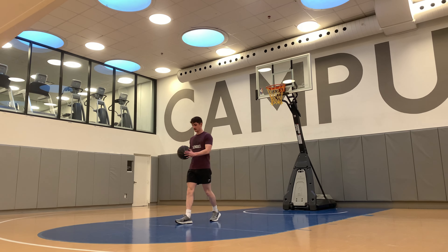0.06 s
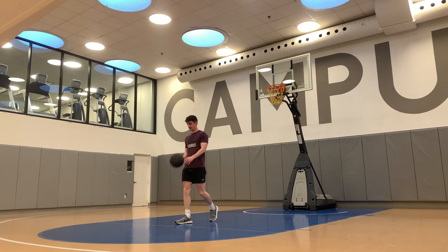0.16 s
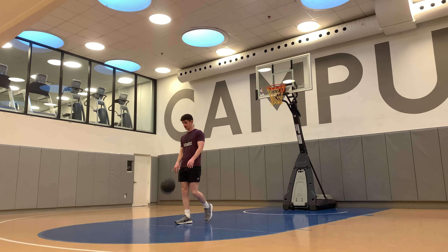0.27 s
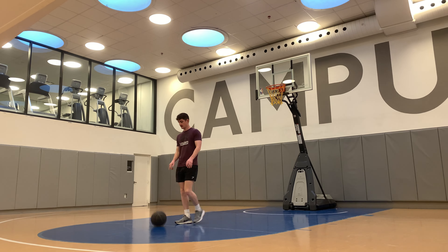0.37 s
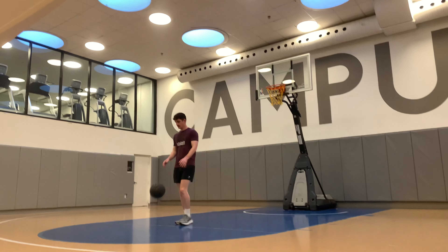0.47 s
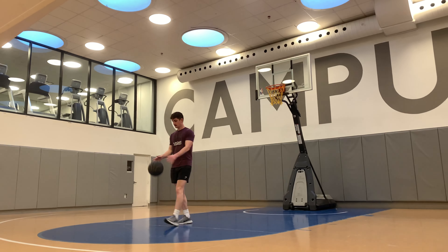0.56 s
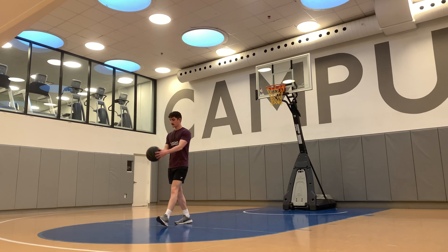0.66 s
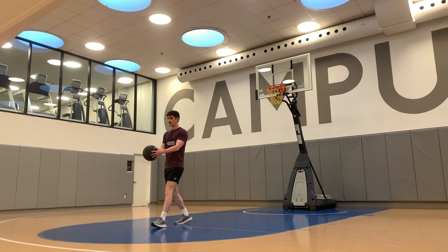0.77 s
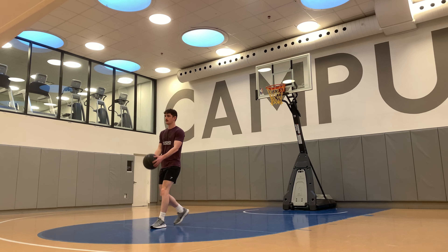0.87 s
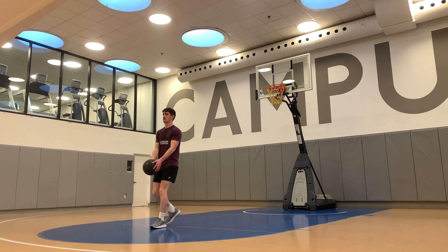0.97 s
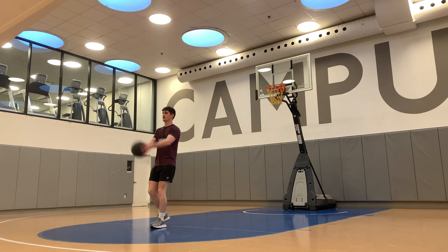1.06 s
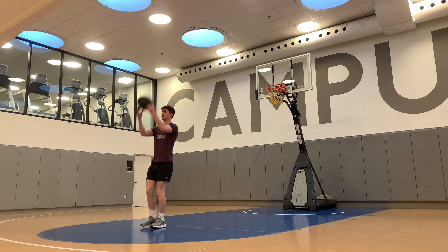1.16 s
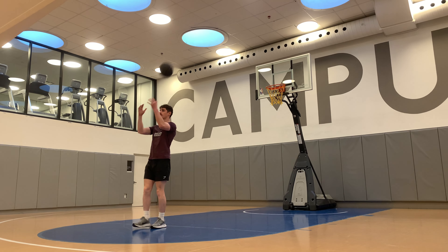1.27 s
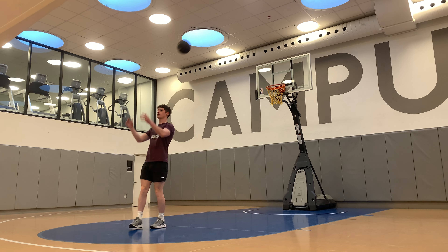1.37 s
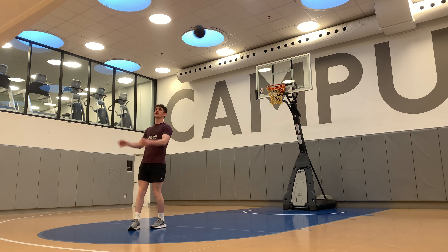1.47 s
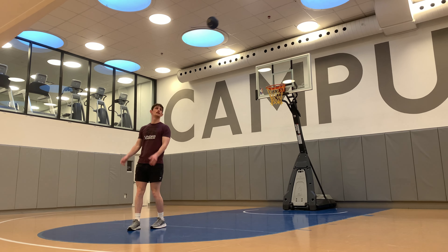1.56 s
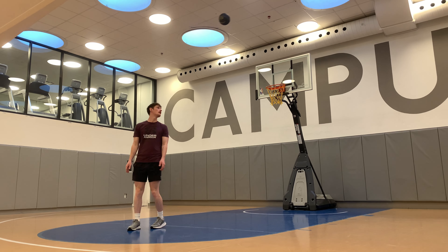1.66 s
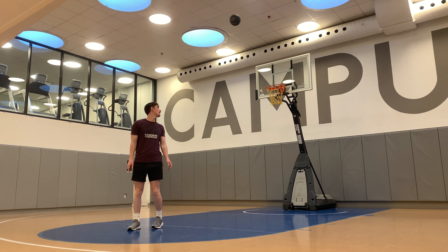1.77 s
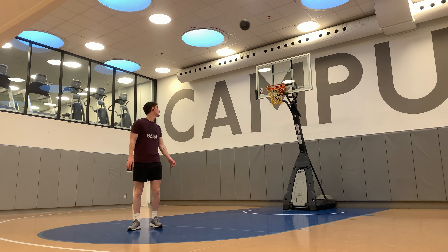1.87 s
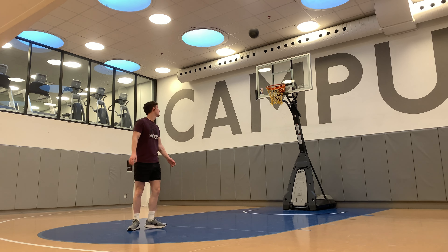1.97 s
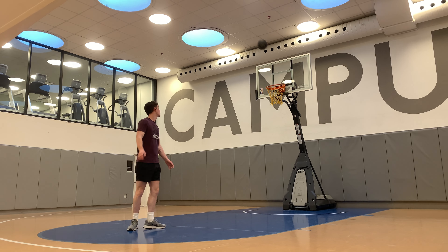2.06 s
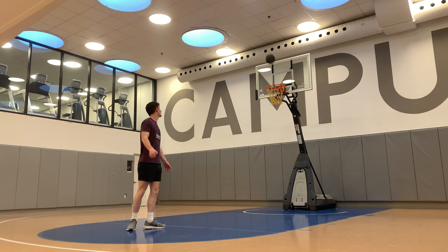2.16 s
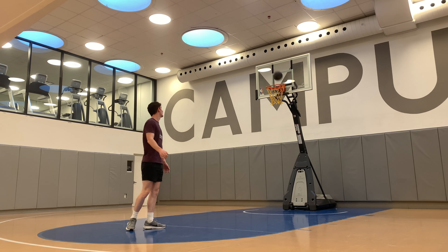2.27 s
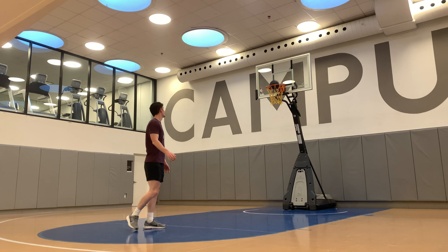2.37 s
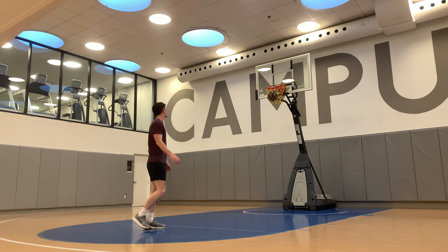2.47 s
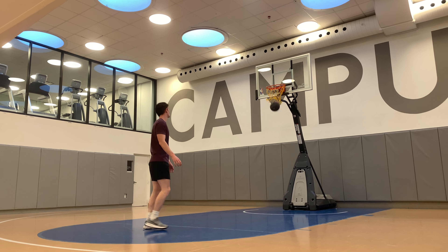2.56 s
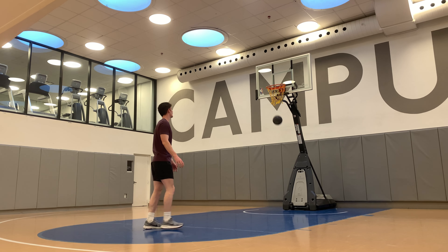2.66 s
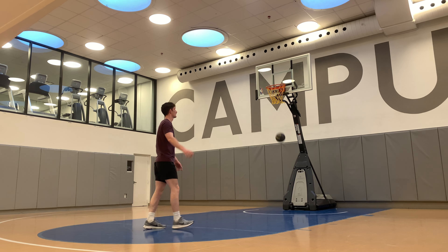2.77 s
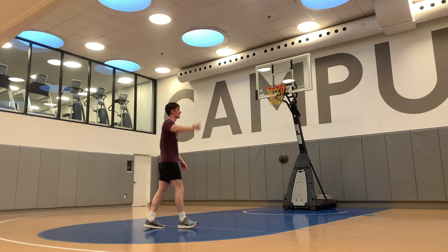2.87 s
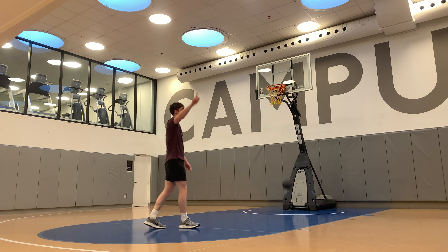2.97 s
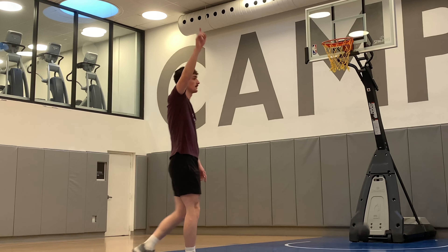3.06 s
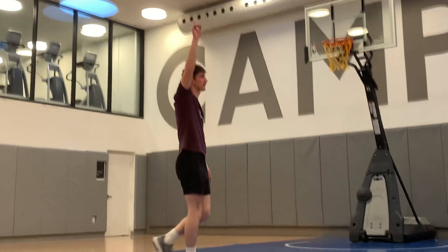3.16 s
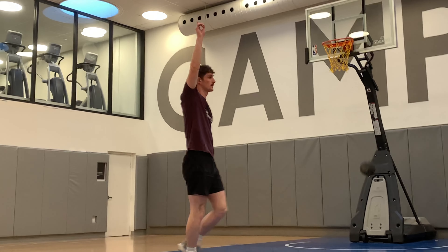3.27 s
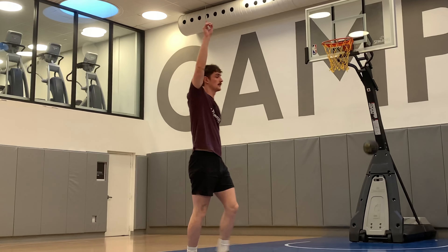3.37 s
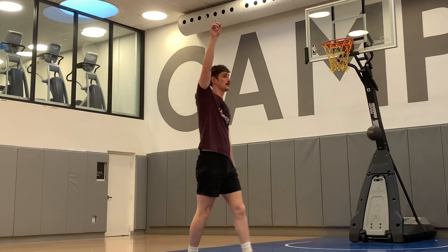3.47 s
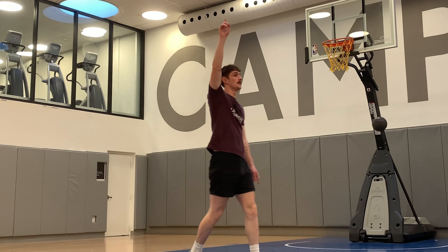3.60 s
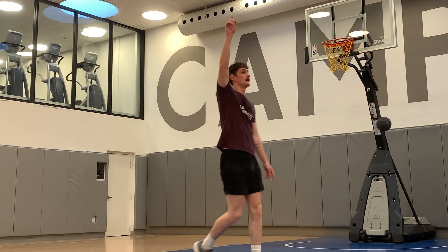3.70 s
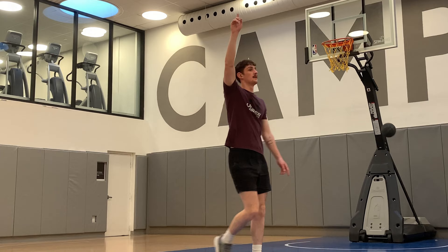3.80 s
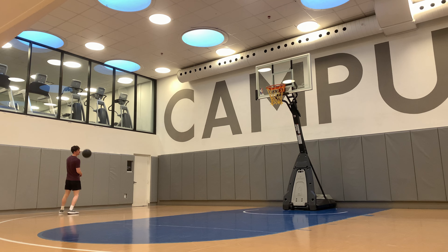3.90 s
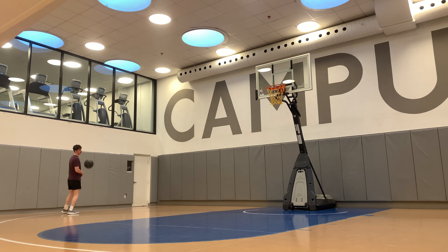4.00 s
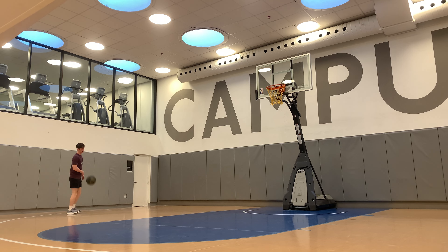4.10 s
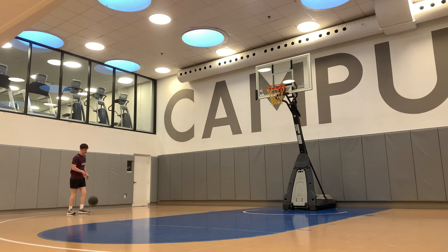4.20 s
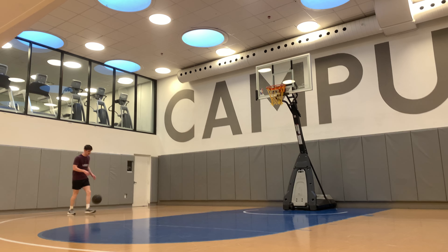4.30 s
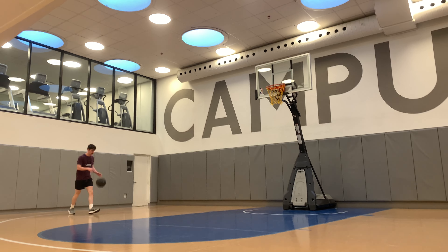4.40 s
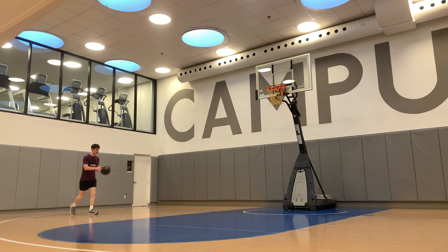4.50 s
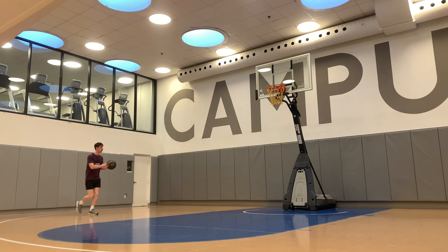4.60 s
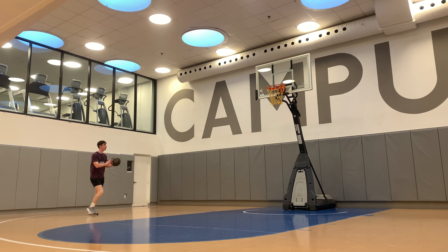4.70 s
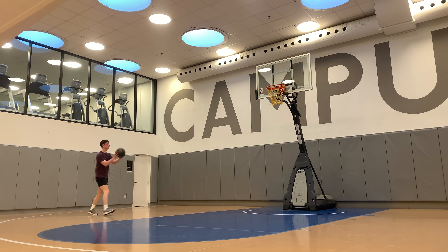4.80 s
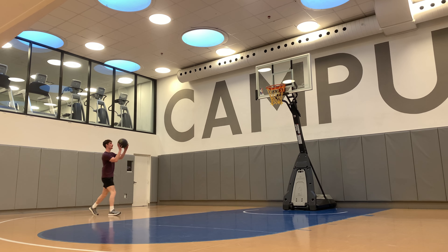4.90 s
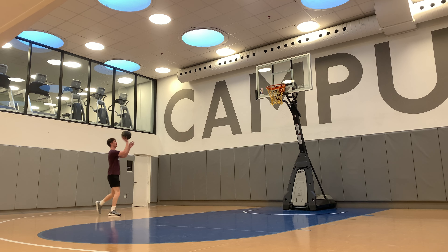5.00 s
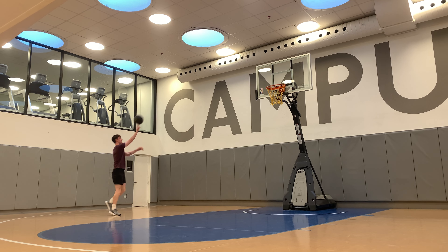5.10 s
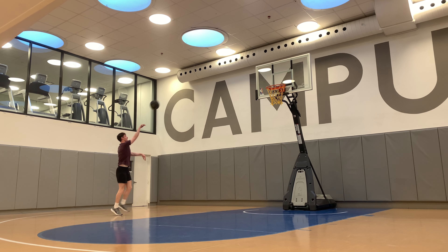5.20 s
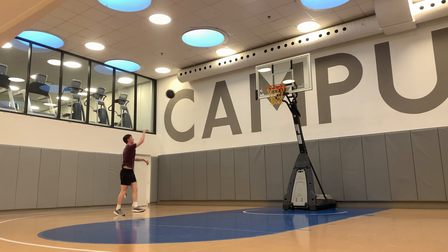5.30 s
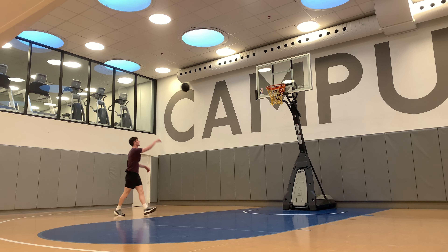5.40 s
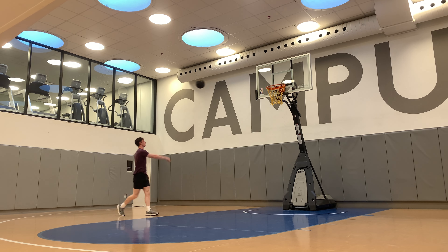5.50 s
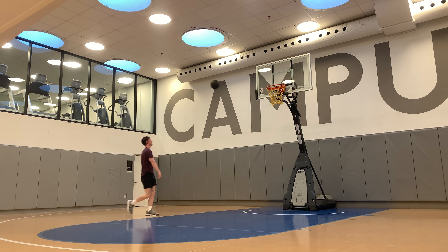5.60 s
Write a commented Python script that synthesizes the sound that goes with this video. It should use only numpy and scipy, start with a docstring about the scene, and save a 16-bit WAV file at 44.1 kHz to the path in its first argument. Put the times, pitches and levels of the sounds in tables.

```python
"""Basketball in a large gym hall

Close to the floor, in stereo: dribbles, a shot off the backboard, footsteps and shoe squeaks.
Each blow is a noise slap, short decaying modes and a gliding thump; bands of noise then carry the hall's decay.
Ventilation rumble and wavering fan tones lie underneath. The squeaks and the ringing hoop are pitched tones
with a noise echo. A cut joins two takes, with a short fade out and in."""
import sys
import numpy as np
from scipy import signal
from scipy.fft import rfft, irfft
from scipy.io import wavfile
from scipy.ndimage import uniform_filter1d

SR = 44100
rng = np.random.default_rng(int(sys.argv[2]) if len(sys.argv) > 2 else 0)


def master(y):
    """Save y as 16-bit WAV."""
    cut = np.clip(np.atleast_2d(y).T, -1, 1)
    pcm = np.round(cut * 32767)  # scale
    wavfile.write(sys.argv[1], SR, pcm.astype(np.int16))


N = 249165  # length in samples
BANDS_HZ = 25 * 2 ** (np.arange(29) / 3)  # third-octave centres
CUT_S = 3.936  # the second take starts here
CONTACT_S = 0.0013  # from the listed time of a blow to its slap, knock and thump

# ball on the boards: (t/s, slap level/dB, knock level/dB, thump level/dB, bass/dB, hall feed/dB,
# brightness/dB per octave)
BOUNCES = [(0.381, -7.5, -17.5, -11, -0.5, -20.5, 0.72), (3.0717, -2.5, -16, -13, -3.5, -16.5, 0.03),
           (4.279, -7, -25, -18.5, 3.5, -23, 0.71)]
# ball on backboard, rim and stand: (t/s, click level/dB, thump level/dB, ring level/dB, bass/dB, hall feed/dB,
# brightness/dB per octave)
RATTLE = [(2.3035, -20, -17, -20, 2, -24, 1.55), (2.4292, -38, -18, -27, -5.5, -30.5, 1),
          (2.457, -56.5, -45, -31.5, -1, -45.5, -1.5), (2.4908, -35, -31.5, -20, -0.5, -36.5, 0.5),
          (2.534, -53, -45, -31.5, -1.2, -45.5, -2), (2.7334, -40, -36.5, -60.5, -5.5, -35, 1)]
# footfalls: (t/s, knock level/dB, thump level/dB, bass/dB, hall feed/dB, brightness/dB per octave)
STEPS = [(1.459, -48, -40.5, 4, -52, -0.1), (2.0062, -38, -46, 1.5, -47, -0.4),
         (4.949, -50.5, -46.5, 0.1, -54.5, 0.8), (5.2758, -53.5, -55.5, 0.1, -57, 1.3),
         (5.5104, -46.5, -41, -6, -45.5, -0.5)]


def undb(db):
    """Gain of a dB value."""
    return 10 ** (np.asarray(db) / 20)


def along(hz, table_hz, values):
    """Table values joined on a log-frequency axis."""
    return np.interp(np.log(hz), np.log(table_hz), values)


def spikes(times, gains):
    """One impulse at each time."""
    x = np.zeros(N)
    np.add.at(x, (np.asarray(times) * SR).astype(int), gains)
    return x


def ring(x, hz, t60):
    """A mode: a decaying sine after each impulse."""
    pole = np.exp(2j * np.pi * hz / SR - np.log(1000) / (t60 * SR))
    return signal.lfilter([1], [1, -pole], x).imag


def body(hits, modes):
    """All modes of one object, struck together."""
    return sum(undb(db) * ring(hits, hz, t60) for hz, db, t60 in modes)


def to_pair(near, other):
    """Spectra of a stereo pair: likeness, balance and shift between left and right set per frequency."""
    # the stereo pair: (f/Hz, likeness/0-1, left minus right level/dB)
    pair = [(60.94, 0.95, -2), (250, 1, -0.5), (495.3, 1, -0.5), (969, 0, 4), (2030, 0, 0.5),
            (5230, 0.3, 2), (6900, .8, -2), (7900, 1, -0.5)]
    bass_shift_s, treble_shift_s, split_hz = .00045, .000204, 6490  # sets the phase of right against left
    hz = np.arange(N // 2 + 1) * SR / N + 1  # the 1 Hz offset keeps the log finite
    pair_hz, alike, pan_db = np.transpose(pair)
    alike = np.clip(along(hz, pair_hz, alike), 0, 1)
    pan = undb(along(hz, pair_hz, pan_db) / 2)
    treble_turn = treble_shift_s * np.maximum(hz - split_hz, 0)
    bass_turn = bass_shift_s * np.minimum(hz, split_hz)
    shared = alike * rfft(near) * np.exp(2j * np.pi * (treble_turn - bass_turn))
    right = shared + np.sqrt(1 - alike ** 2) * rfft(other)
    return np.array([rfft(near) * pan, right / pan]), hz


def hum():
    """Fan tones: noise through narrow resonances, so that each tone wavers."""
    # fan tones: (f/Hz, level/dB)
    fans = [(355, -59.5), (1012, -64.5)]
    out = 0
    for hz, db in fans:
        tone = ring(rng.standard_normal((2, N)), hz, 0.71)
        out = out + undb(db) * tone / tone.std()
    return out


def ventilation():
    """Steady power of the air handling in each band."""
    # spectrum of the air, shape only: (f/Hz, relative level/dB per Hz)
    air_shape = [(18, -35.5), (30, -11), (61, 2.5), (170, -12.5), (209, -10), (287, -26.5), (353, -3.5),
                 (423, -18), (699, -22), (748, -21.5), (1030, -30), (1480, -31), (7000, -69), (9100, -99),
                 (15400, -120)]
    total_db = -44.5
    air_hz, air_db = np.transpose(air_shape)
    power = undb(along(BANDS_HZ, air_hz, air_db)) ** 2 * BANDS_HZ
    return power / power.sum() * undb(total_db) ** 2


def feeds(hz, t60):
    """Times and levels (dB) with which the blows fill one band of the hall."""
    # centres at which the colours below hold: f/Hz
    blow_hz = [65, 105, 155, 235, 420, 1000, 2600, 8000]
    # colour of a bounce, a hit on the hoop and a footfall in the hall: level/dB at each centre
    bounce_colour_db = [3.5, 2.5, 4.5, -1.3, -0.5, -10.5, -6, -5.5]
    rattle_colour_db = [-6, -2, 6, 1.5, 0.5, -7, -10.5, -15.5]
    step_colour_db = [-3.5, 2.5, 9, 0.5, -2.5, -9.5, -7, -33]
    # bounces struck before each take starts, still ringing: (ring enters at t/s, struck earlier by/s, hall feed/dB)
    linger = [(0, 0.44, -18), (3.938, 0.63, -23)]
    bass_hz, tilt_hz = 170, 420  # bass column is halved here; brightness turns here
    kinds = ((BOUNCES, bounce_colour_db), (RATTLE, rattle_colour_db), (STEPS, step_colour_db))
    s, db = [], []
    for rows, colour_db in kinds:
        for start, *_, bass_db, feed_db, tilt_db in rows:
            bass = bass_db / (1 + (hz / bass_hz) ** 2)
            tilt = tilt_db * np.log2(hz / tilt_hz)
            s.append(start)
            db.append(feed_db + bass + tilt + along(hz, blow_hz, colour_db))
    for start, ago, feed_db in linger:
        s.append(start)
        db.append(feed_db + along(hz, blow_hz, bounce_colour_db) - 60 * ago / t60)
    return np.array(s), np.array(db)


def hall():
    """Each band of the hall stores the energy of the blows, builds up and dies; the air handling never stops."""
    # the hall: (f/Hz, t60/s, build-up/s, colour level/dB)
    hall_bands = [(30.5, 1, 0.044, -27), (49.75, 1.8, 0.017, -14), (66.6, 1.2, 0.01, -9),
                  (124, 1.365, 0.0061, -3.5), (158.9, 1.52, 0.011, -13), (247, 1.53, 0.0033, -12.5),
                  (471.3, 0.92, 0.0036, -10.5), (736, 1.1, 0.0067, -10.5), (1063, 1.336, 0.0022, -5.5),
                  (1610, 1.29, 0.013, -13), (2330, 1.32, 0.01, -11), (4020, 1.112, 0.02, -15.5),
                  (5000, 0.9, 0.027, -18.5), (6140, 0.76, 0.017, -15.5), (10600, 0.22, 0.028, -16),
                  (13570, 0.32, 0.011, -24), (16400, 0.17, .01, -33)]
    first_wall_s, scatter_share = 0.0032, 0.25
    grain_db, grain_s = 0.5, 0.0088  # the tail flickers by this much, smoothed over this time
    field, hz = to_pair(*rng.standard_normal((2, N)))
    hall_hz, t60s, builds, colour_db = np.transpose(hall_bands)
    grain = uniform_filter1d(rng.standard_normal(N), int(grain_s * SR))
    grain = undb(2 * grain_db * grain / grain.std())  # doubled dB: it acts on energy
    cut, out = int(CUT_S * SR), 0
    for centre, steady in zip(BANDS_HZ, ventilation()):
        share = np.cos(np.pi / 2 * np.clip(3 * np.log2(hz / centre), -1, 1))
        band = irfft(field * share, N)
        t60 = along(centre, hall_hz, t60s)
        s, db = feeds(centre, t60)
        power = undb(db + along(centre, hall_hz, colour_db)) ** 2
        # only floor scatter is heard until the first wall answers
        energy = scatter_share * spikes(s + CONTACT_S, power) + spikes(s + first_wall_s, power)
        fill = np.exp(-1 / (along(centre, hall_hz, builds) * SR))
        drain = 1000. ** (-2 / (t60 * SR))
        poles = np.convolve([1, -fill], [1, -drain])
        # nothing rings across the cut
        parts = (energy[:cut], energy[cut:])
        energy = np.concatenate([signal.lfilter([1 - fill], poles, part) for part in parts])
        flicker = grain if centre > 400 else 1
        out = out + band / band.std() * np.sqrt(energy * flicker + steady)
    return out


def swells():
    """After each bounce the low boom swells and fades several times, in two series that weaken."""
    # boom of each bounce: (first swell delay/s, second swell delay/s, repeat/s,
    # first level/dB, second level/dB, second f/Hz)
    booms = [(.03, 0.068, .1, -10.5, -16.5, 85), (.031, .07, .121, -9.5, -13, 96),
             (.016, 0.0632, .104, -13.5, -12.5, 110)]
    first_hz, lengths_s, fade_db_s = 104, (0.033, 0.016), 41.5  # the fade is in dB per second of repeats
    t, boom = np.arange(N) / SR, 0
    for bounce, (first, second, repeat, first_db, second_db, second_hz) in zip(BOUNCES, booms):
        series = zip((first, second), (first_db, second_db), (first_hz, second_hz), lengths_s)
        for delay, db, hz, length in series:
            for k, turn in enumerate(rng.random(size=4)):
                since = t - bounce[0] - delay - k * repeat
                shape = np.cos(np.pi * np.clip(since / (1.5 * length), -.5, .5)) ** 2
                tone = np.sin(2 * np.pi * (hz * t + turn))
                boom = boom + undb(db - fade_db_s * k * repeat) * shape * tone
    return irfft(to_pair(boom, boom)[0], N)


def squeaks():
    """Rubber soles stick and slip on the floor: uneven gliding tones with harmonics."""
    # squeaks: (t/s, length/s, slip rate f/Hz, glide/share, unevenness/share, level/dB,
    # 2nd harmonic against the first/dB)
    slips = [(2.732, 0.033, 876, 0.22, .14, -41.5, 3.5), (2.769, 0.02, 1009, -0.052, 0.069, -47.5, 13.5),
             (3.349, 0.037, 1091, -0.067, .03, -37.5, -13), (3.382, .08, 946, -0.06, .04, -39, -9),
             (3.662, 0.054, 1094, 0.018, 0.049, -42.5, -14.5),
             (3.675, 0.086, 955.7, .03, .025, -43.5, -3.5)]
    third_db, higher_db = -4, -31  # 3rd harmonic and each of the 4th to 10th, against the 2nd
    t, dry = np.arange(N) / SR, 0
    wobble = uniform_filter1d(rng.standard_normal(N), size=300)
    wobble = wobble / wobble.std()
    for s, length, hz, glide, uneven, db, second_db in slips:
        gone = np.clip((t - s) / length, 0, 1)
        phase = 2 * np.pi * np.cumsum(hz * (1 + glide * gone + uneven * wobble)) / SR
        tone = np.sin(phase) + undb(second_db) * np.sin(2 * phase)
        tone = tone + undb(second_db + third_db) * np.sin(3 * phase)
        tone = tone + undb(second_db + higher_db) * sum(np.sin(k * phase) for k in range(4, 11))
        dry = dry + undb(db) * tone * np.minimum(20 * gone, 1) * np.sqrt(1 - gone)
    return dry


def hoop():
    """Backboard, rim and stand ring in their modes at each hit of the ball."""
    # backboard, rim and stand: (f/Hz, level/dB, t60/s)
    hoop_modes = [(114, -5, 0.27), (221, -12, 0.15), (239.2, -1.5, 0.22), (396.4, -1, 0.071),
                  (485, -14.5, 0.17), (676, -6.5, 0.13), (840, -15, .12), (1091, -16, .08),
                  (1180, -14.5, 0.036), (1470, -21.5, .1)]
    s, ring_db = np.array(RATTLE)[:, [0, 3]].T
    return body(spikes(s, undb(ring_db)), hoop_modes)


def through_hall(dry):
    """Pitched sounds heard straight and by way of a decaying noise echo, up to the cut."""
    t60_s, dry_db, damp = 1.16, -2.5, 0.45  # dry level is against an echo of unit energy
    echo = rng.standard_normal((2, SR)) * 1000. ** (-np.arange(SR) / SR / t60_s)
    echo = signal.lfilter([1], [1, -damp], echo)  # air dulls the echo
    echo = echo / np.sqrt(np.mean(np.sum(echo ** 2, axis=1)))
    wet = signal.fftconvolve(dry[None], echo, axes=1)[:, :N]
    pair = irfft(to_pair(*(wet + undb(dry_db) * dry))[0], N)
    return pair * (np.arange(N) < CUT_S * SR)


def contacts():
    """Every blow and distinct echo as (s, slap dB, knock dB, thump dB)."""
    # wall and ceiling echoes that stand out: (t/s, slap level/dB, thump level/dB)
    standouts = [(0.422, -29.5, -35), (2.333, -17, -30.5), (2.345, -31.5, -24), (3.0765, -3.5, -30.5),
                 (3.111, -21.5, -20.5), (3.117, -28, -23.5), (4.301, -12, -18.5), (4.3091, -22, -23)]
    rattle_knock_db = -7  # knock against click
    step_slap_db = -30  # soft soles: slap against knock
    echo_knock_db = -12  # knock against thump
    step_echo_s, step_echo_db = .035, -11.5  # the nearest wall answers each step
    blows = [row[:4] for row in BOUNCES]
    blows += [(s, click, click + rattle_knock_db, thump) for s, click, thump, *_ in RATTLE]
    steps = np.array([(s, knock + step_slap_db, knock, thump) for s, knock, thump, *_ in STEPS])
    answers = steps + [step_echo_s, step_echo_db, step_echo_db, step_echo_db]
    echoes = [(s, slap, thump + echo_knock_db, thump) for s, slap, thump in standouts]
    late_blows = np.r_[blows, steps, answers] + [CONTACT_S, 0, 0, 0]
    return np.r_[late_blows, echoes].T


def direct():
    """The slap of rubber, the knock and the thump of the boards, straight and off the nearest walls."""
    # hard contact on the boards: (f/Hz, level/dB, t60/s)
    knock_modes = [(644, 2.5, .025), (1570, 3.5, 0.0033), (2070, -2.5, .015), (3400, -21, .012)]
    # bending waves in the boards carry the high part of the thump fastest:
    # (first f/Hz, last f/Hz, glide/s, rise/s, level/dB)
    thump_glide = (480, 110, 0.0039, 0.0049, 4.6)
    soft_hz = 3000  # rubber rounds off the knock above this
    s, slap_db, knock_db, thump_db = contacts()

    t = np.arange(60) / SR
    burst = rng.standard_normal((2, 60)) * np.exp(-t / .0003)
    crack = signal.sosfilt(signal.butter(2, [3500, 11500], "band", fs=SR, output="sos"), burst)
    slap_hits = spikes(s, undb(slap_db))
    slaps = [np.convolve(slap_hits, c / np.abs(c).max())[:N] for c in crack]

    first_hz, last_hz, glide, rise, db = thump_glide
    t = np.arange(3000) / SR
    phase = 2 * np.pi * np.cumsum(last_hz + (first_hz - last_hz) * np.exp(-t / glide)) / SR
    thump = undb(db) * np.sin(phase) * t / rise * np.exp(1 - t / rise)
    thumps = signal.fftconvolve(spikes(s, undb(thump_db)), thump)[:N]

    knocks = body(spikes(s, undb(knock_db)), knock_modes)
    knocks = signal.sosfilt(signal.butter(3, soft_hz, fs=SR, output="sos"), knocks)
    rings = knocks + thumps
    return irfft(to_pair(slaps[0] + rings, slaps[1] + rings)[0], N)


def scene():
    """Fans, hall with its air, boom, shoes, hoop and blows."""
    pitched = through_hall(squeaks() + hoop())
    return hum() + hall() + swells() + pitched + direct()


def record(dry):
    """The cut fades out and in; the microphone hisses, loses the deepest bass, rounds peaks and cuts the top."""
    fade_out_s, fade_in_s = .04, .03
    hiss_db = -80.5  # self-noise
    bottom_hz, top_hz = 43.7, 15900
    drive = 0.57  # how hard the loudest peaks push the input stage
    t = np.arange(N) / SR - CUT_S
    fade = np.clip(np.maximum(-t / fade_out_s, t / fade_in_s), 0, 1)
    wet = (dry + undb(hiss_db) * rng.standard_normal(dry.shape)) * fade
    wet = signal.sosfilt(signal.butter(2, bottom_hz, "high", fs=SR, output="sos"), wet)
    wet = np.tanh(drive * wet) / drive
    return signal.sosfilt(signal.ellip(8, .2, 70, top_hz, fs=SR, output="sos"), wet)


dry = scene()
out = record(dry)
master(out)
```